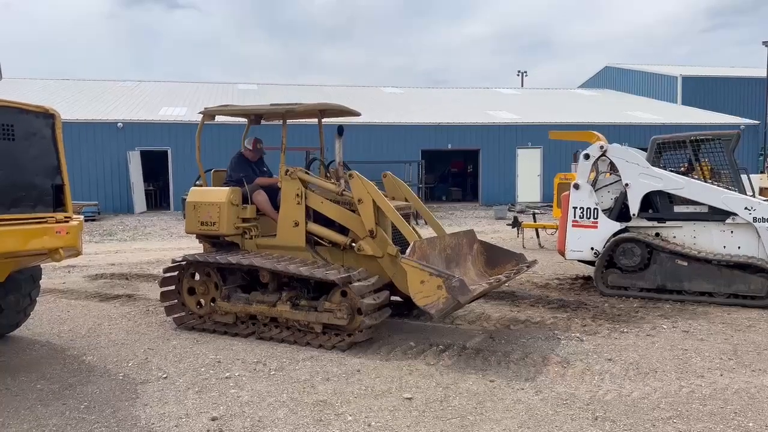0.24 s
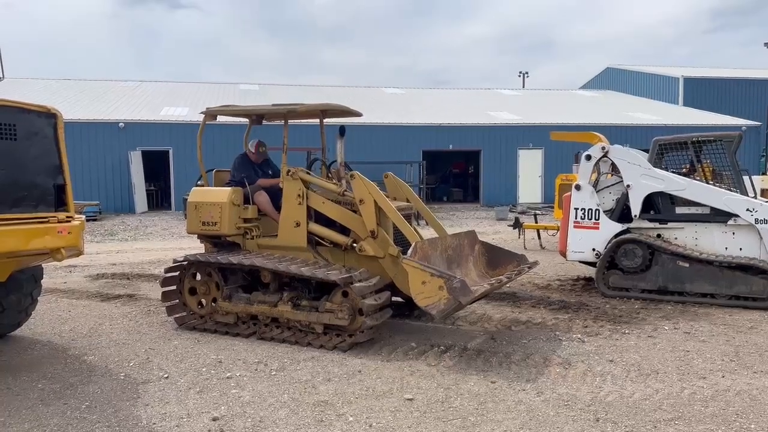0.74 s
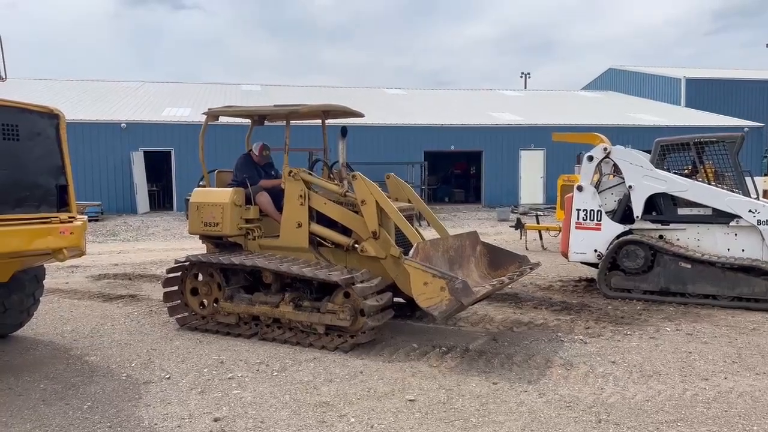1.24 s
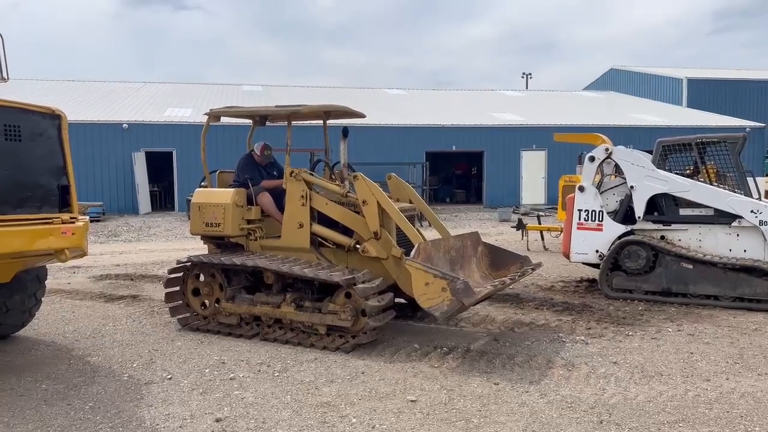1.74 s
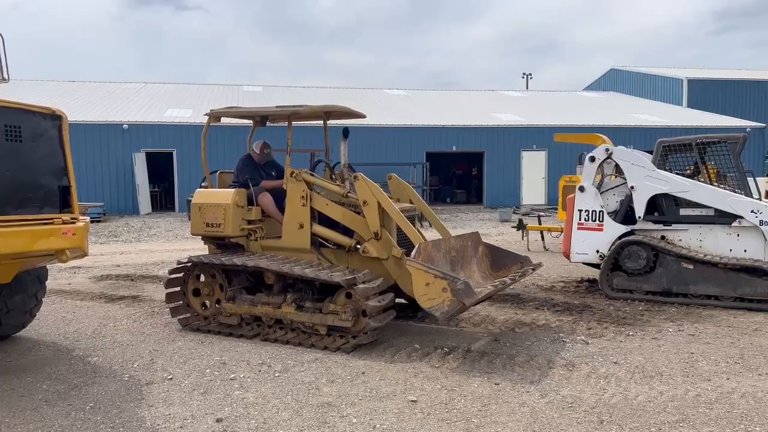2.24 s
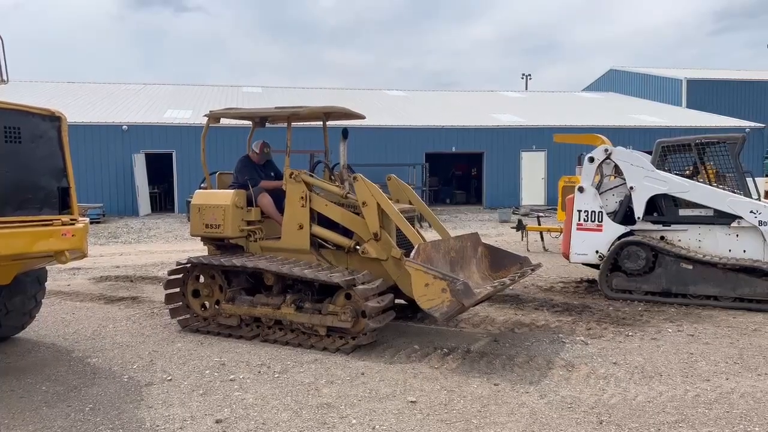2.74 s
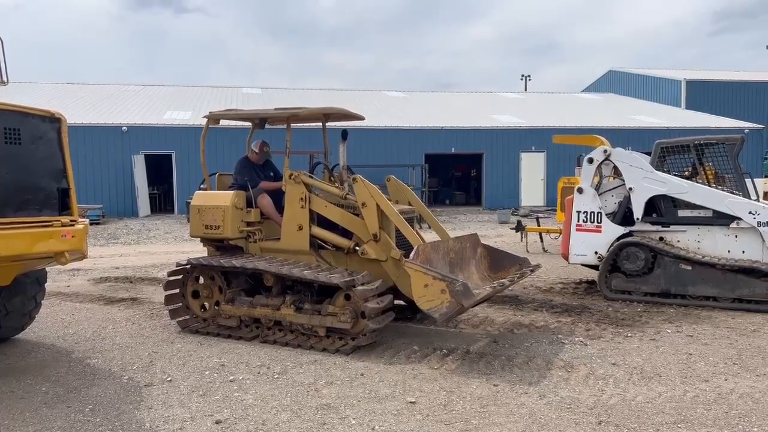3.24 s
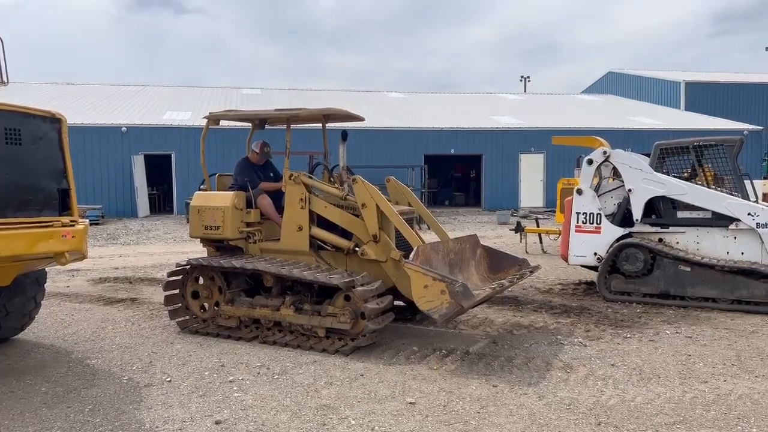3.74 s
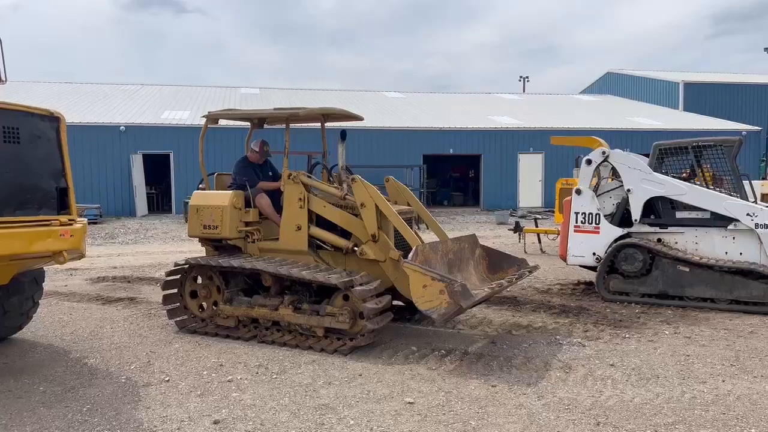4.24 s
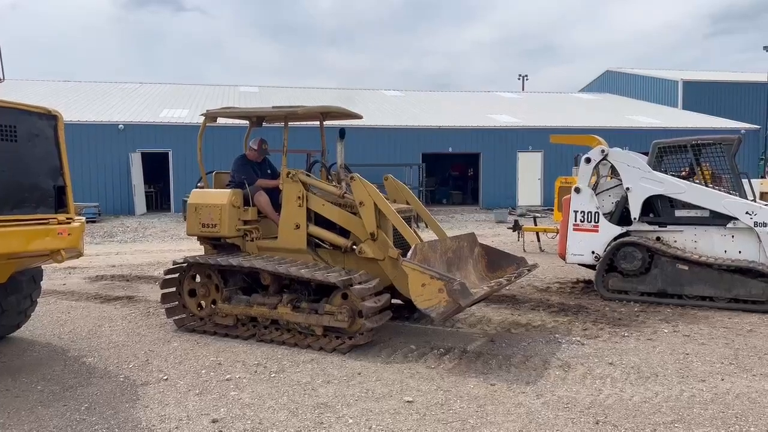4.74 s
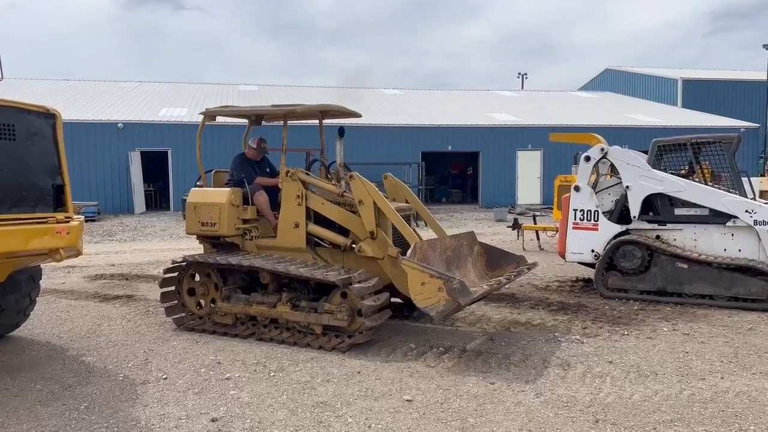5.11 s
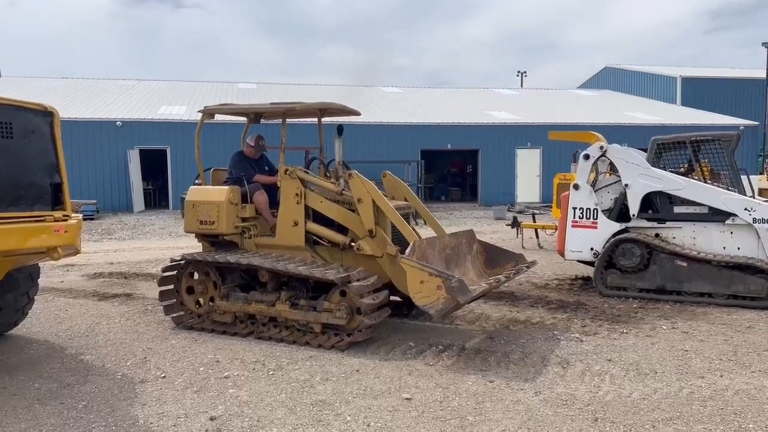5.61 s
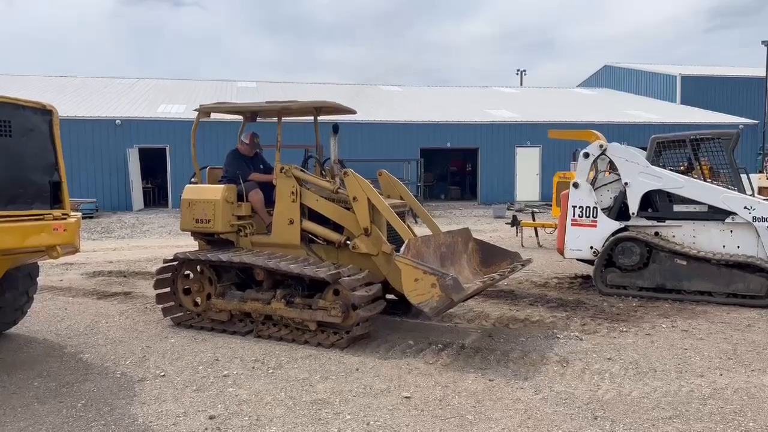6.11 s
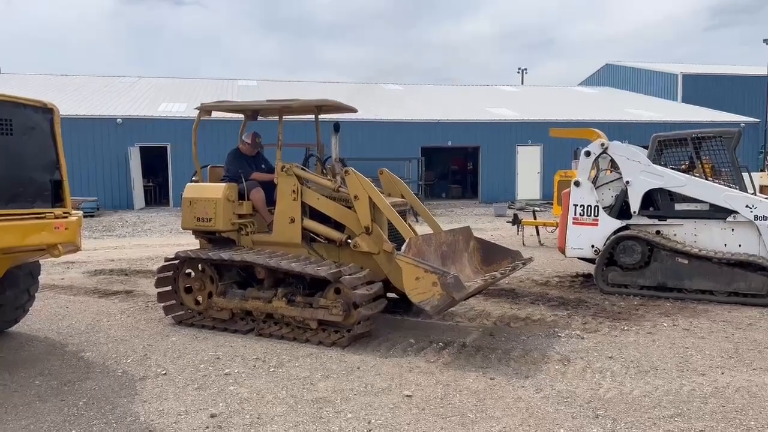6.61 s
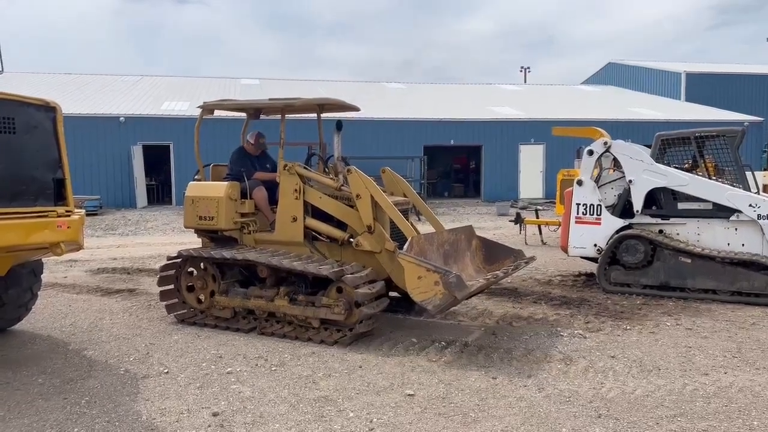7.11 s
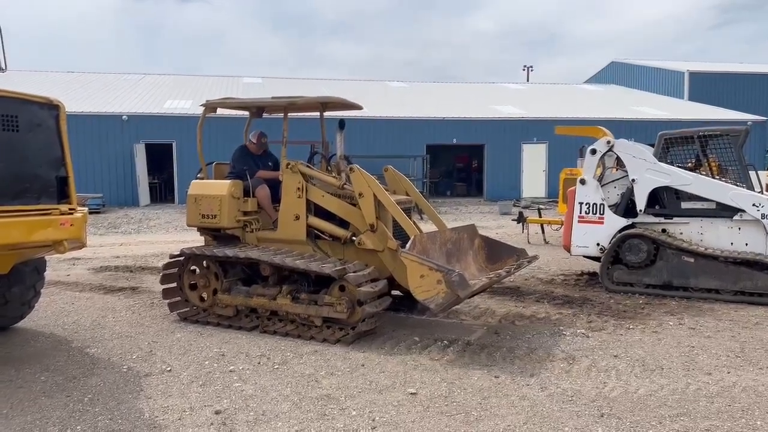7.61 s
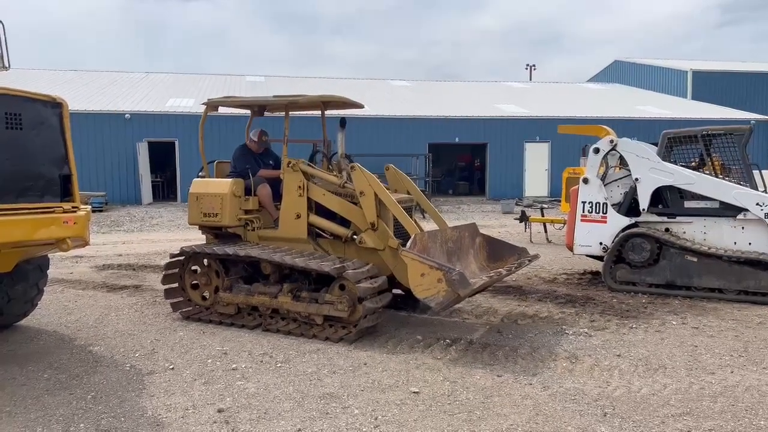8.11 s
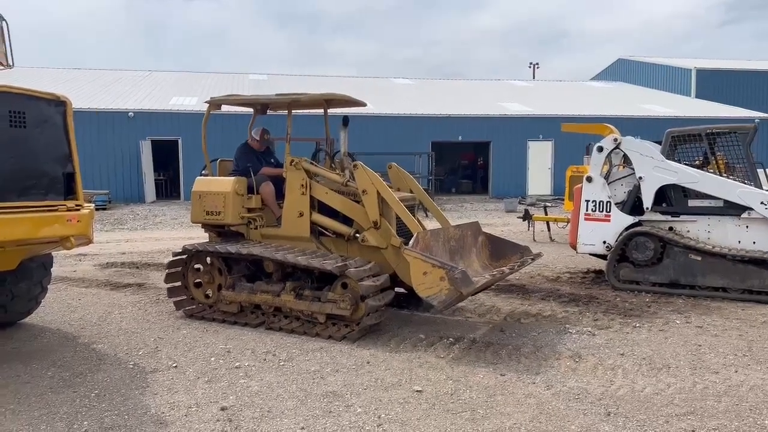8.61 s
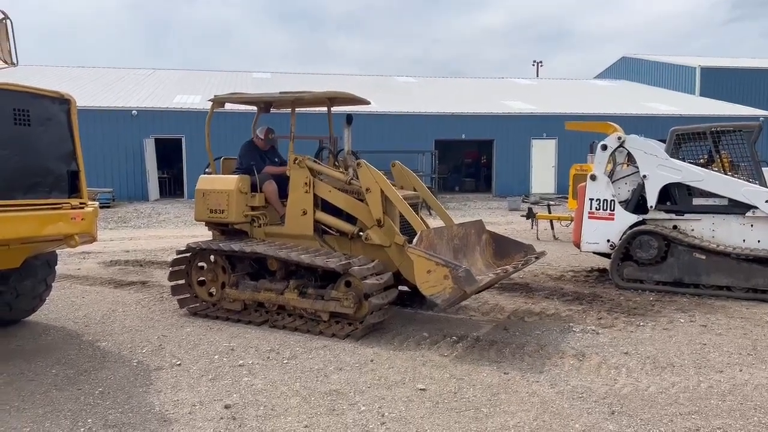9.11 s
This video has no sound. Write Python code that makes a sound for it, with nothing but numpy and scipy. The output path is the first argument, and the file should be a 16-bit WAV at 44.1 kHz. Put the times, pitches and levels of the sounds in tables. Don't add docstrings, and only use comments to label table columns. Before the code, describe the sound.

A four-cylinder diesel crawler loader idles with a steady clatter outdoors, twice bogging down under hydraulic load with booming exhaust and hard metallic knocking.

```python
import sys
import numpy as np
from scipy import signal
from scipy.fft import rfft, irfft, next_fast_len
from scipy.io import wavfile
from scipy.ndimage import uniform_filter1d

SR = 44100
rng = np.random.default_rng(int(sys.argv[2]) if len(sys.argv) > 2 else 0)


def attenuation_scalar(level_db):
    decades = np.asarray(level_db, float) / 20
    return 10 ** decades


def unload_audio(sound):
    columns = np.transpose(np.atleast_2d(sound))
    steps = np.round(np.clip(columns, -1, 1) * 32767)
    wavfile.write(sys.argv[1], SR, steps.astype(np.int16))


N = 412335
PAD = next_fast_len(N)

# time_s, cycle_rate_hz
SPEED = [(0.0, 12.855), (3.0, 12.842), (3.72, 12.336), (3.89, 11.837), (4.05, 12.315), (4.22, 11.843),
         (4.79, 11.423), (4.95, 11.722), (5.59, 12.258), (5.82, 10.851), (5.99, 11.073), (6.15, 13.137),
         (6.26, 12.86), (7.86, 12.857), (8.07, 11.317), (8.19, 12.118), (8.38, 12.897), (9.36, 12.8)]
# time_s, fuel_share
EFFORT = [(3.2, 0.51), (3.6, 0.58), (3.8, 0.67), (3.95, 0.79), (4.4, 0.9), (4.9, 0.93), (5.3, 0.9),
          (5.6, 0.8), (5.75, 0.89), (5.97, 0.93), (6.13, 0.8), (6.2, 0.44), (6.45, 0.43), (7.94, 0.43),
          (8.0, 0.61), (8.17, 0.91), (8.33, 0.67), (8.55, 0.47)]
START_TURN = .9656
IDLE_RATE_HZ, LOADED_RATE_HZ = 12.8, 11.7
EFFORT_LEVELS = {"firing": (-36, 2, 2.3), "boom": (-37, 15.6, 3.3), "clatter": (-31.5, 8.64, 2.87),
                 "hiss": (-47, 15.7, 1.76), "rumble": (-32.5, 6.4, 1), "knock": (-54, 46.3, 1.05)}

# cycle_order, idle_db, load_db
EXHAUST_ORDERS = [(2, -61, -55), (3, -66, -53), (4, -37, -34), (5, -50, -46), (6, -59, -53), (7, -41, -40),
                  (8, -39, -26), (9, -41, -39), (10, -54, -38), (11, -44, -46), (12, -37, -46),
                  (13, -39, -38), (14, -43, -50), (15, -49, -41), (16, -37, -44), (17, -50, -40),
                  (18, -47, -46), (19, -45, -43), (20, -52, -42), (21, -58, -54), (22, -60, -49),
                  (23, -62, -50), (24, -60, -47), (25, -53, -55), (27, -60, -54), (28, -62, -55),
                  (29, -62, -56), (31, -58, -57), (32, -47, -53)]
ORDER_LEADS = {4: .58, 8: .12, 12: -.21, 15: -.33, 16: -.35, 17: .4}
# pitch_hz, width_hz, gain_db
PIPE_MODES = [
    (181.6, 5, 7.5),
    (210, 10, 7),
    (238, 7.7, 7),
    (267, 9.1, 8),
]
# start_s, hold_s, level_db
PANEL_SPELLS = [
    (2.323, .1, -34),
    (3.366, 0.14, -31.5),
    (3.754, 0.47, -27),
    (5.596, 0.078, -29.5),
    (6.447, .6, -30),
    (7.444, 0.038, -30.5),
    (8.004, 0.036, -30.5),
    (8.33, 0.27, -28),
    (9.138, 0.049, -29.5),
]
PANEL_HZ, PANEL_WIDTH_HZ = 148.5, 8
PANEL_REST_DB, PANEL_LOADED_DB = -34.5, -14
PANEL_RISE_DB_PER_S, PANEL_FALL_DB_PER_S = 35, 94

# cycle_share, crack_db, ring_db, unevenness_db
CYLINDERS = [
    (.995, 0.0, 0.0, 1.0),
    (.74, -5.5, -5.5, 1.8),
    (.522, -15, -12, 2.5),
    (.26, -25, -21, 2.0),
]
KNOCK_SCATTER = .008
EVENING_PER_HZ = 0.21
CRACK_UNLOADED_DB, RING_UNLOADED_DB = -5, -5
# time_s, crack_db,
# ring_db, thud_db
DRAG_KNOCKS = [(3.8371, -22, -21.5, -27), (3.9191, -20, -20.5, -19), (3.9823, -22, -27, -27),
               (4.0023, -20.5, -20, -23), (4.0838, -18, -20.5, -21.5), (4.128, -25, -31, -25),
               (4.148, -27, -22, -19), (4.1674, -17, -23, -37), (4.23, -22, -22, -39),
               (4.2516, -14, -13.5, -38), (4.316, -20, -22, -24), (4.336, -16.5, -14.5, -38),
               (4.4009, -22, -17, -27), (4.421, -10, -15.5, -30), (4.4683, -25.5, -19, -23),
               (4.486, -18, -20, -21), (4.5078, -12, -13, -19), (4.5715, -16, -19, -22),
               (4.5939, -13.5, -10, -19.5), (4.6562, -18, -16.5, -13), (4.6792, -9, -13, -21),
               (4.7458, -15, -23, -18), (4.768, -11.5, -9, -28), (4.832, -17, -20, -19.5),
               (4.854, -12, -16, -15), (4.9202, -11.5, -17, -23), (4.941, -16, -10.5, -27),
               (5.004, -21, -21, -24), (5.0251, -10.5, -9.5, -21), (5.0706, -30, -26, -23),
               (5.0882, -17, -15.5, -37), (5.1104, -11, -14, -36), (5.1551, -23, -25, -30),
               (5.172, -18, -20, -19), (5.191, -14.5, -13.5, -32), (5.2379, -27, -35, -26),
               (5.2568, -21, -20, -30), (5.2783, -15.5, -13, -33), (5.3392, -22, -16, -24),
               (5.36, -13, -19, -23), (5.4046, -25, -35, -37), (5.423, -20, -23, -29),
               (5.443, -12.5, -13, -17), (5.526, -15.5, -17, -25), (5.586, -24, -27, -34),
               (5.607, -17, -21, -23),
               (5.671, -18.5, -21, -31), (5.6927, -16, -23, -19), (5.7377, -21, -28, -18),
                (5.7579, -16, -14.5, -16), (5.7809, -13, -11.5, -23), (5.8287, -17.5, -27, -26),
                (5.8495, -11.5, -20, -38), (5.8724, -14, -11, -33), (5.9202, -15, -21, -25),
                (5.941, -13, -17.5, -13.5), (5.9635, -10.5, -9.5, -19), (6.009, -25, -23, -34),
                (6.027, -15.5, -22, -19), (6.0504, -16, -18.5, -28), (6.1104, -18.5, -25, -27),
                (6.13, -19, -21.5, -24), (6.1906, -37, -30, -37), (6.207, -26.5, -32, -35)]
# time_s, crack_db, ring_db, thud_db
BLIP_KNOCKS = [
    (8.001, -20, -23, -31),
    (8.0474, -27.5, -23, -33),
    (8.088, -20, -18.5, -15),
    (8.11, -23, -30, -33),
    (8.1511, -15.5, -17.5, -26),
    (8.1722, -12, -14, -28),
    (8.2346, -24, -21.5, -19),
    (8.2568, -21, -18, -19.5),
    (8.3155, -24, -34, -36),
    (8.336, -21, -21.5, -27),
]
SAME_KNOCK_S = .009
CRACK_GAIN_DB, RING_GAIN_DB, THUD_GAIN_DB, THUD_UNDER_RING_DB = -0.5, 0.9, -1.5, 1
# freq_hz, density_db
CRACK_SPECTRUM = [(1470, -45), (2500, 1), (3610, -1), (4430, -4.5), (4920, 2.5), (9110, -3.5),
                  (10400, -13.5), (11300, -2), (12000, -80), (15600, -66), (22000, -120)]
CRACK_EDGES_HZ = [1500, 3200, 4600, 6300, 8500, 13000]
CRACK_WITH_RING = [.7, .5, .3, 0, 0]
INJECTOR_LEAD_S, INJECTOR_DB = 0.0037, -11
# pitch_hz, width_hz, level_db
KNOCK_RING = [
    (1350, 195, 2),
    (1548, 174, 6.5),
    (1662, 140, 7.5),
    (2083, 140, -1.5),
    (2318, 117, 2.5),
]
# pitch_hz, width_hz, level_db
KNOCK_THUD = [
    (750, 115, -5),
    (944, 90, -0.5),
]

# cycle_share, level_db
CONTACTS = [
    (.0, 4.5),
    (0.059, 0.5),
    (0.171, -2),
    (.25, -1.5),
    (.32, -0.5),
    (.42, -7),
    (.56, 1),
    (.76, 2),
    (.835, 5.5),
]
# pitch_hz, width_hz, level_db
BLOCK_MODES = [(637, 91, -8.5), (743, 24, -4.5), (826, 53, 0), (934, 183, -7), (1234, 78, -7.5),
               (1427.5, 29.6, 0), (1513, 33, -1.5), (1637, 61, -1), (1730, 36, -2.5), (1890, 80, -7.5),
               (2077, 74, -8), (2298, 42, -8.5), (2712, 30, -9.5)]
FRESH_IDLE, FRESH_LOADED = 1.0, 2.6
TAPPET_SHARE, TAPPET_DB = .835, -27.5
# pitch_hz, width_hz, level_db
TAPPET_MODES = [
    (2020, 170, 2.5),
    (2330, 83, 0),
]

# cycle_order, idle_db, load_db, throb_share
WHINES = [(52, -56, -50, 0), (54, -49, -54, 0), (56, -50, -50, 0), (68, -53, -56, 0), (93, -55, -58, 0),
          (111, -46.5, -52, 0), (114, -53, -57, 0), (115, -54, -57, 0), (117, -52, -56, 0),
          (119, -46, -52, 0), (120, -49, -54, 0), (122, -50, -56, 0), (128, -48, -54, 0),
          (132, -39.5, -50, .6), (133, -49, -55, 0), (134, -51, -56, 0), (137, -53, -57, 0),
          (138, -49, -56, 0), (144, -53, -57, 0), (146, -47.5, -55, 0)]
THROB_ANGLE = .08
# time_s, pitch_hz, level_db
RELIEF = [
    (4.15, 632, -62),
    (4.3, 632, -37.5),
    (4.62, 630, -37.5),
    (4.76, 617, -44),
    (5.1, 618, -39),
    (5.4, 621, -39),
    (5.65, 632, -37.5),
    (5.8, 632, -38),
    (5.95, 628, -62),
]
# freq_hz, density_db
HISS_SPECTRUM = [(1650, -28), (2750, -3.5), (3100, -1), (3450, -5.5), (3900, -6.5), (5000, -4),
                 (5600, -8.5), (6000, -9.5), (6450, -4), (7300, -10.5), (8400, -9), (8900, -11),
                 (9600, -23), (12000, -8)]
# freq_hz, density_db
RUMBLE_SPECTRUM = [(15, -21), (40, -2), (60, -0.5), (110, -2), (190, 2), (260, -3), (300, -6), (500, -11.5),
                   (700, -5.5), (1100, -10), (2500, -13.5), (4000, -79)]

# delay_s, level_db
ECHOES = [
    (0.029, -10.5),
    (.058, -24),
    (.103, -21),
]
# freq_hz, side_minus_mid_db
WIDTH = [(60, -14), (190, -21), (350, -16), (620, -12), (1000, -17), (1350, -7), (2500, -5), (3000, 1),
         (3600, 1), (4000, -6), (4700, 3), (8000, 1.5), (8600, 0), (10300, 3), (11000, 0)]
# freq_hz, left_minus_right_db
LEAN = [
    (60, 0),
    (190, 0),
    (620, -.6),
    (2010, -1.5),
    (3620, .5),
    (6490, 2.7),
    (11700, 3),
]
# freq_hz, share
SAME_SHARE = [
    (60, .5),
    (1000, .62),
    (2500, .58),
    (4000, .25),
    (12000, .3),
]
# centre_hz, width_hz, time_share
SUM_NULLS = [(3050, 200, .35), (3280, 260, .45), (3560, 260, .28), (3950, 200, .15), (4200, 220, .2),
             (4700, 200, .25), (5000, 260, .25), (5300, 280, .25), (5750, 240, .3), (6030, 300, .55),
             (6600, 240, .1), (7050, 240, .2), (7350, 280, .25), (7900, 260, .22), (8600, 280, .25),
             (9200, 300, .25), (10000, 720, .25), (11300, 1360, .4)]
# centre_hz, width_hz, time_share
SIDE_NULLS = [(100, 200, .72), (270, 140, .6), (410, 140, .4), (570, 180, .15), (790, 260, .3),
              (1030, 220, .48), (1220, 160, .25), (2750, 220, .25), (4120, 260, .42), (4500, 200, .15),
              (11500, 1400, .7)]
NULL_FRAME, NULL_SHIFT, NULL_WIDEN = 2048, 366, 1.25
NEARING_DB, NEARING_S = -3, 3.6


def rms_one(x):
    return x / np.sqrt(np.mean(x ** 2) + 1e-20)


def in_time(rows):
    time_s, *columns = np.transpose(rows)
    return [np.interp(np.arange(N) / SR, time_s, column) for column in columns]


def at_hz(points):
    hz, value = np.transpose(points)
    bin_hz = np.arange(PAD // 2 + 1) * SR / PAD
    return np.interp(np.log(bin_hz + 1), np.log(hz), value)


def coloured(x, spectrum):
    return rms_one(irfft(rfft(x, PAD) * attenuation_scalar(at_hz(spectrum)), PAD)[:N])


def drift(rate_hz):
    r = np.exp(-80 * np.pi * rate_hz / SR)
    noise = rng.standard_normal(N // 40 + 2002)
    slow = signal.lfilter([1], [1, -2 * r, r * r], noise)[2000:]
    return np.interp(np.arange(N) / 40, np.arange(len(slow)), rms_one(slow))


def resonate(x, modes):
    out = np.zeros(len(x))
    for k, (hz, width_hz, level_db) in enumerate(modes):
        r = np.exp(-np.pi * width_hz / SR)
        top = (1 - r * r) / 2 * np.array([1, 0, -1])
        bottom = [1, -2 * r * np.cos(2 * np.pi * hz / SR), r * r]
        out += (-1) ** k * attenuation_scalar(level_db) * signal.lfilter(top, bottom, x)
    return out


def bursts(s, db, rise_s, fall_s, tail_s):
    marks = np.full(N, 1e-18)
    marks[(s * SR).astype(int)] = attenuation_scalar(db)
    fall, tail = (signal.lfilter([1], [1, -np.exp(-1 / (tau * SR))], marks) for tau in (fall_s, tail_s))
    smooth = np.exp(-1 / (rise_s * SR))
    return signal.lfilter([1 - smooth], [1, -smooth], fall + .17 * tail)


def follow(part, effort):
    idle_db, gain_db, bend = EFFORT_LEVELS[part]
    return idle_db + gain_db * np.clip(effort, 0, 2) ** bend


def exhaust(turn, rate, load, firing_db, boom_db):
    controls = np.array([turn, rate, load, firing_db, boom_db, panel_hum(load)])
    turn, rate, load, firing_db, boom_db, panel_db = controls[:, ::8]
    out = np.zeros(len(turn))
    for order, idle_db, load_db in EXHAUST_ORDERS:
        loading = np.minimum(3 * load, 1) if order % 16 == 0 else load
        level_db = idle_db + loading * (load_db - idle_db)
        level_db += (0.8 + 1.0 * load) * drift(1.8)[::8]
        level_db += load * sum(db * np.exp(-((order * rate - hz) / width) ** 2) for hz, width, db in PIPE_MODES)
        level_db = {4: firing_db, 8: boom_db, 32: level_db + 1.56}.get(order, level_db)
        if order == 12:
            detune = (order * rate - PANEL_HZ) / PANEL_WIDTH_HZ
            level_db = np.maximum(level_db, panel_db - 2.8 * detune ** 4)
        swell, lead = (.68, .18) if order < 10 else (.21, .89)
        lead += ORDER_LEADS.get(order, 0) + .25 * load * (order not in (4, 8))
        out += np.sqrt(2) * attenuation_scalar(level_db) * np.cos(2 * np.pi * (order * (turn - swell) + lead))
    return signal.resample_poly(out, up=8, down=1)[:N]


def panel_hum(load):
    t = np.arange(N) / SR
    spells = []
    for start_s, hold_s, db in PANEL_SPELLS:
        before_db = PANEL_RISE_DB_PER_S * np.maximum(start_s - t, 0)
        after_db = PANEL_FALL_DB_PER_S * np.maximum(t - start_s - hold_s, 0)
        spells.append(db - before_db - after_db)
    return np.maximum(np.max(spells, axis=0), PANEL_REST_DB + PANEL_LOADED_DB * load)


def firings(turn, rate, load, effort):
    at, crack_db, ring_db, uneven_db = np.transpose(CYLINDERS)
    cycles = np.arange(1, int(turn[-1]) - 1)[:, None]
    chance = rng.standard_normal((len(cycles), 3, len(at)))
    i = np.searchsorted(turn, cycles + at + KNOCK_SCATTER * chance[:, 0])
    db = follow("knock", effort[i])
    apart = np.clip(1 + EVENING_PER_HZ * (rate[i] - LOADED_RATE_HZ), .3, 1.2)
    unloaded = 1 - load[i]
    crack_db = db + apart * crack_db + CRACK_UNLOADED_DB * unloaded + uneven_db * chance[:, 1]
    ring_db = db + apart * ring_db + RING_UNLOADED_DB * unloaded + 1.8 * uneven_db * chance[:, 2]
    return i.ravel() / SR, crack_db.ravel(), ring_db.ravel()


def with_listed(s, crack_db, ring_db):
    at, crack, ring, thud = np.transpose(DRAG_KNOCKS + BLIP_KNOCKS)
    met_db = -60 * (abs(s[:, None] - at).min(axis=1) < SAME_KNOCK_S)
    return (np.r_[s, at],
            np.r_[crack_db + met_db, crack + CRACK_GAIN_DB],
            np.r_[ring_db + met_db, ring + RING_GAIN_DB],
            np.r_[ring_db + met_db - THUD_UNDER_RING_DB, thud + THUD_GAIN_DB])


def knocks(s, crack_db, ring_db, thud_db):
    noise = coloured(rng.standard_normal(N), CRACK_SPECTRUM)
    uneven_db = 1.5 * rng.standard_normal((len(s), len(CRACK_EDGES_HZ)))
    part_db = crack_db[:, None] + uneven_db[:, :-1] + np.outer(ring_db - crack_db, CRACK_WITH_RING)
    s_all = np.r_[s, s - INJECTOR_LEAD_S]
    part_db = np.r_[part_db, part_db + INJECTOR_DB]
    out = np.zeros(N)
    for k, edges_hz in enumerate(zip(CRACK_EDGES_HZ, CRACK_EDGES_HZ[1:])):
        band = signal.sosfilt(signal.butter(2, edges_hz, "band", fs=SR, output="sos"), noise)
        out += band * bursts(s_all, part_db[:, k], rise_s=.0012, fall_s=.004, tail_s=0.023)
    white = rng.standard_normal(N)
    blow = bursts(s, ring_db - 0.5, rise_s=0.000067, fall_s=0.0039, tail_s=0.021)
    push = bursts(s, thud_db, rise_s=0.00088, fall_s=0.0038, tail_s=0.015)
    for shape, modes in ((blow, KNOCK_RING), (push, KNOCK_THUD)):
        out += resonate(shape * white, modes) / np.std(resonate(white[:SR], modes))
    return out


def contact_gate(turn, decay, floor_db):
    cycle = np.arange(1024) / 1024
    gate = attenuation_scalar(floor_db) + sum(attenuation_scalar(db) * np.exp(-((cycle - at) % 1) / decay) for at, db in CONTACTS)
    return gate[(turn % 1 * 1024).astype(int)]


def clatter(turn, load, clatter_db):
    decay, floor_db = .045, -11.0
    gate = contact_gate(np.arange(1024) / 1024, decay, floor_db)
    parts = rfft(rng.standard_normal(1024) * gate)
    flat = rms_one(irfft(parts / abs(parts)))
    impacts = flat * np.sqrt(np.mean(gate ** 2))
    repeated = impacts[(turn % 1 * 1024).astype(int)]
    fresh = rng.standard_normal(N) * (FRESH_IDLE + (FRESH_LOADED - FRESH_IDLE) * load)
    rung = resonate(repeated + fresh * contact_gate(turn, decay, floor_db), BLOCK_MODES)
    return attenuation_scalar(clatter_db - 2.0) * rung / np.sqrt(uniform_filter1d(rung ** 2, size=SR // 2))


def tappet(turn, clatter_db):
    count = np.floor(turn - TAPPET_SHARE)
    ticks = np.diff(count, prepend=count[0])
    rung = resonate(ticks + 1e-18, TAPPET_MODES)
    return attenuation_scalar(TAPPET_DB + .5 * (clatter_db - clatter_db.min())) * rung / rung.max()


def whines(turn, load):
    out = np.zeros(N)
    throb = np.cos(8 * np.pi * (turn - THROB_ANGLE))
    waver = [(drift(6.0), drift(4.0)) for k in range(5)]
    for k, (order, idle_db, load_db, share) in enumerate(WHINES):
        swell, wobble = waver[k % 5]
        level = attenuation_scalar(idle_db + load * (load_db - idle_db) + 2.0 * swell) * (1 + share * throb)
        phase_turns = order * turn + rng.random() + .07 * wobble
        out += np.sqrt(2) * level * np.cos(2 * np.pi * phase_turns)
    return out


def relief_valve():
    hz, level_db = in_time(RELIEF)
    level = attenuation_scalar(level_db + 1.8 * drift(5.0))
    turns = np.cumsum(hz + 2.3 * drift(10.0)) / SR
    return np.sqrt(2) * level * np.cos(2 * np.pi * turns)


def hiss(turn, hiss_db):
    level = attenuation_scalar(hiss_db + 1.0 * drift(15.0))
    noise = coloured(rng.standard_normal(N), HISS_SPECTRUM)
    return level * rms_one(noise * contact_gate(turn, decay=0.13, floor_db=14.0))


def rumble(rumble_db):
    return attenuation_scalar(rumble_db - 3.0 + 1.0 * drift(6.6)) * coloured(rng.standard_normal(N), RUMBLE_SPECTRUM)


def echoed(x):
    dull = signal.lfilter([.3], [1, -.7], x)
    return x + sum(attenuation_scalar(db) * np.roll(dull, int(s * SR)) for s, db in ECHOES)


def yard(near, far):
    mid = rfft(near, PAD)
    same = at_hz(SAME_SHARE)
    own = np.sqrt(1 - same ** 2) * rfft(far, PAD)
    side = (1j * same * mid + own) * attenuation_scalar(at_hz(WIDTH))
    lean = attenuation_scalar(at_hz(LEAN) / 2)
    return irfft([(mid + side) * lean, (mid - side) / lean], PAD)[:, :N]


def dropped(x, nulls, shy):
    padded = np.r_[np.zeros(NULL_SHIFT), x]
    hz, s, frames = signal.stft(padded, SR, window="cosine", nperseg=NULL_FRAME)
    chance = rms_one(signal.lfilter([1], [1, -.45], rng.standard_normal((len(nulls), len(s)))))
    shy = np.interp(s, np.arange(N) / SR, shy)
    shut = np.zeros(frames.shape)
    for (centre_hz, width_hz, share), luck in zip(nulls, chance):
        inside = abs(hz - centre_hz) < NULL_WIDEN * width_hz / 2
        shut[inside] = luck + 3.4 * share - 1.5 > shy
    return signal.istft(frames * shut, SR, window="cosine", nperseg=NULL_FRAME)[1][NULL_SHIFT:][:N]


def band_nulls(ears, load):
    mid, side = ears.mean(axis=0), (ears[0] - ears[1]) / 2
    lost_mid = dropped(mid, SUM_NULLS, .5 * load)
    lost_side = dropped(side, SIDE_NULLS, .3 + 0 * load)
    return ears - lost_mid - lost_side * [[1], [-1]]


def scene():
    (rate,), (effort,) = in_time(SPEED), in_time(EFFORT)
    turn = START_TURN + np.cumsum(rate) / SR
    slowing = np.clip((IDLE_RATE_HZ - rate) / (IDLE_RATE_HZ - LOADED_RATE_HZ), 0, 1)
    load = uniform_filter1d(slowing, size=SR // 10)
    clatter_db = follow("clatter", effort)

    tones = exhaust(turn, rate, load, follow("firing", effort), follow("boom", effort))
    tones = tones + whines(turn, load) + relief_valve() + tappet(turn, clatter_db)

    fired = with_listed(*firings(turn, rate, load, effort))
    faces = []
    for face in range(2):
        engine = clatter(turn, load, clatter_db) + knocks(*fired) + hiss(turn, follow("hiss", effort))
        faces.append(echoed(engine) + rumble(follow("rumble", effort)))
    near, far = faces

    nearing = attenuation_scalar(NEARING_DB * np.maximum(1 - np.arange(N) / SR / NEARING_S, 0))
    return nearing * band_nulls(yard(near + tones, far), load)


def low_pass(x):
    return signal.sosfilt(signal.butter(12, 12260, fs=SR, output="sos"), x)


def record(dry):
    rounded = 1.05 * np.tanh(dry / 1.05)
    mix = signal.sosfilt(signal.cheby2(10, 60, 12400, fs=SR, output="sos"), rounded)
    return low_pass(mix)


dry = scene()
out = record(dry)
unload_audio(out)
```